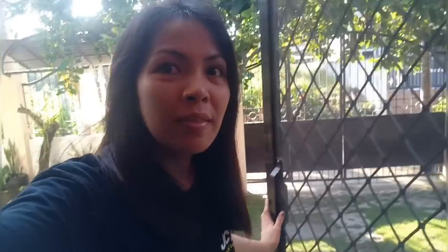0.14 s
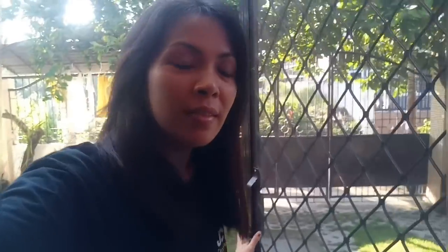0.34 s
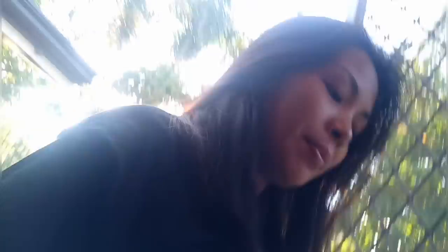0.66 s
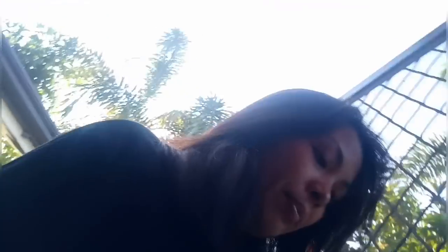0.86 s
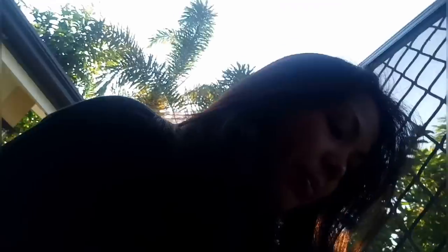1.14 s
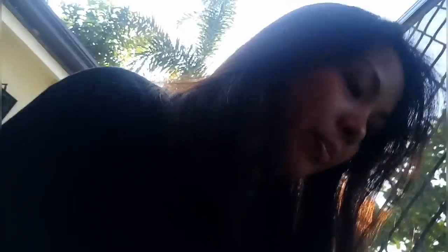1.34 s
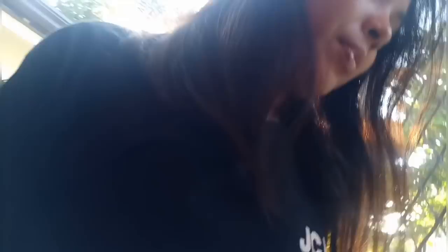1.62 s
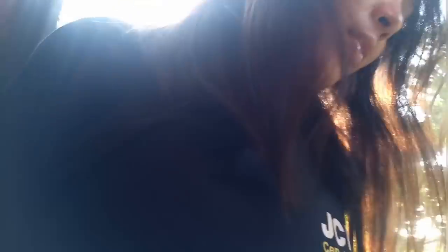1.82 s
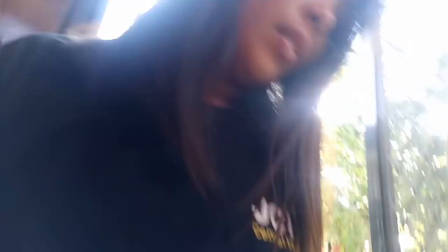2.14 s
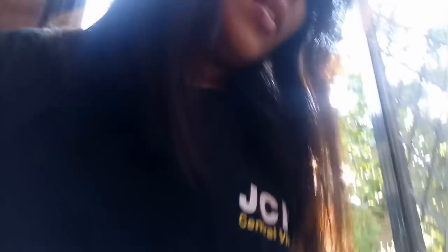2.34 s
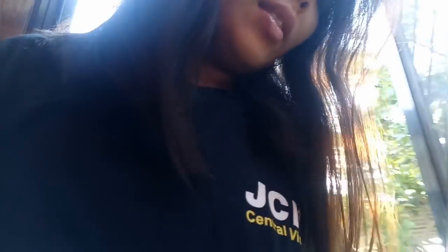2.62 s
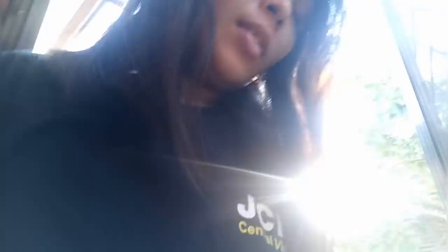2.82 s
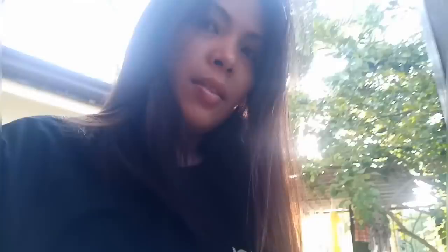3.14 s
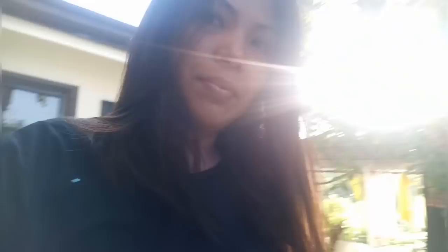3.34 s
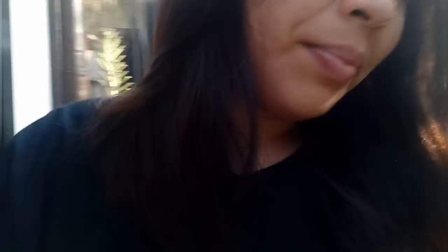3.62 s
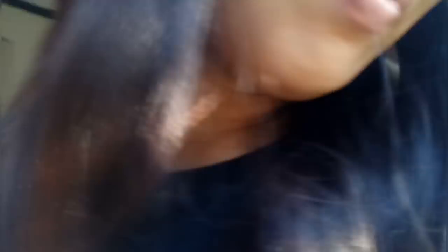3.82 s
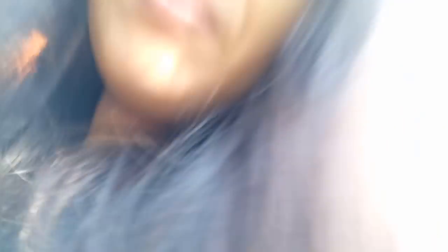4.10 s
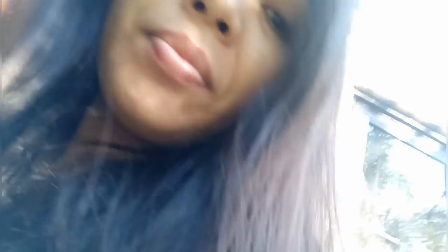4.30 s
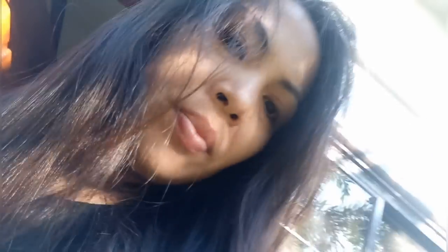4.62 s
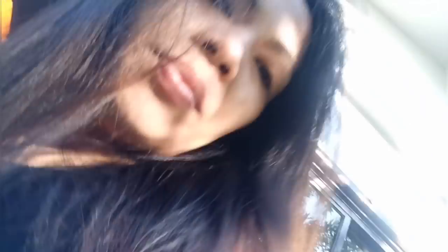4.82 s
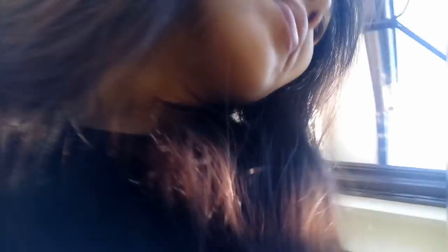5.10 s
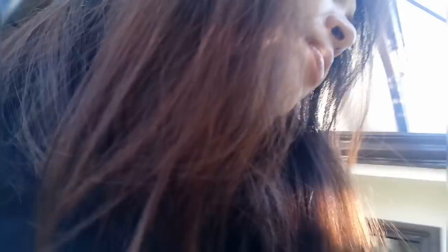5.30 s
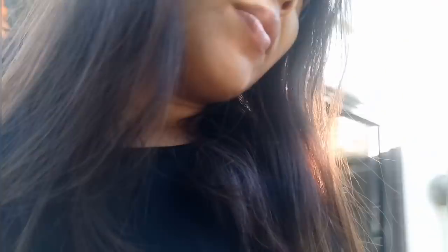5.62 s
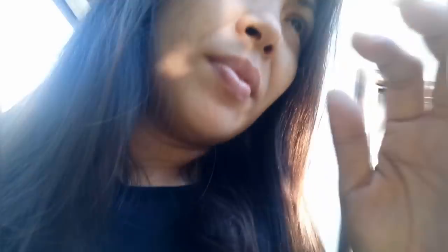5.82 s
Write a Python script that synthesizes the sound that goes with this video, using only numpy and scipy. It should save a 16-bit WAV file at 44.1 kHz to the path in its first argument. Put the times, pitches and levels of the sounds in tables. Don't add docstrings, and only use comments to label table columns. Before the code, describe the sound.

A close, rough phone pickup in an open yard, weighted to the left, with slight short echo and a faint far engine hum that swells now and then. From 0 to 0.6 s cloth and hair rustle and crackle, with a gritty grate and a thin, very high hinge squeak at about 0.3 s. Softer rustling and small taps follow. At 1.7 s a loud, nearly pure squeal swells, then breaks and drops in throbs by 2.05 s, among dry clicks and a latch rattle at 2.15 s. Fabric crackles and ticks around 2.6 s. At 3.1 s another squeal throbs away into falling scrapes; at 3.55 s come chirps and rasps, then a higher, longer squeal grips repeatedly until 4.05 s and ends falling by 4.3 s. Light latch rattles follow at 4.5 s, a heavy knock at 4.8 s, rustling and taps near 5.2 s, a sagging rough squeak at 5.4 s, and a low groan with a faint rising chirp at the end.

```python
import sys
import numpy as np
from scipy import signal
from scipy.fft import rfft, irfft, next_fast_len
from scipy.io import wavfile
from scipy.ndimage import uniform_filter1d, minimum_filter1d

SR = 44100
rng = np.random.default_rng(int(sys.argv[2]) if len(sys.argv) > 2 else 0)


def undo_db(level):
    steps = np.asarray(level, float) / 20
    return 10 ** steps


def put_to_file(sound):
    columns = np.atleast_2d(sound).T
    safe = np.clip(columns, -1, 1)
    whole_steps = np.round(safe * 32767)
    wavfile.write(sys.argv[1], SR, whole_steps.astype(np.int16))


N = 262629
TIME = np.arange(N) / SR
CONTROL_TIME = TIME[::64]

# (frequency [Hz], density [dB per Hz])
ENGINE_SPECTRUM = [(30, -26), (53, -7.5), (86, -6.5), (128, -0.5), (178, -8.5), (209, -18.5), (238, -14.5),
                   (260, -23), (340, -23.5), (570, -120)]
# (peak time [s], peak level [dB], fall [dB per s])
HUM_SWELLS = [
    (0.33, -65, 8),
    (1.21, -56.5, 124),
    (1.47, -62.5, 21),
    (2.19, -60, 152),
    (2.619, -59, 208),
    (2.83, -57.5, 27),
    (3.38, -59.5, 155),
    (3.882, -61.5, 45),
    (4.84, -55, 62),
    (5.9, -61, 27),
]
# (frequency [Hz], density [dB per Hz])
CLOTH_BED = [(250, -91), (500, -95), (1100, -99), (1800, -98), (3800, -85.5), (5500, -92.5)]
# (peak time [s], length [s], peak level [dB], centre [Hz])
STROKES = [(0.175, 0.36, -37, 2500), (0.282, 0.3, -32.5, 1820), (0.33, 0.33, -50, 604),
           (0.536, 0.35, -39.5, 2220), (0.972, 0.35, -49, 4400), (1.294, 0.1, -40.5, 3280),
           (1.6, 0.2, -46, 2150), (1.606, 0.67, -46.5, 4250), (1.928, 0.22, -38, 4900),
           (2.025, 0.2, -37, 3260), (2.162, 0.081, -36, 1430), (2.188, 0.079, -41.5, 630),
           (2.4, 0.069, -53, 1740), (2.567, 0.57, -47, 2160), (2.64, 0.099, -37.5, 3750),
           (2.798, 0.68, -45.5, 5000), (3.082, 0.06, -50, 3800), (3.325, 0.35, -46.5, 1740),
           (3.63, 0.21, -46, 3030), (4.148, 0.36, -44, 2900), (4.51, 0.14, -56, 2520),
           (2.647, 0.12, -51, 5500), (4.67, 0.22, -59.5, 3800), (4.836, 0.094, -42, 1700),
           (4.876, 0.58, -43, 3650), (4.902, 0.3, -49, 445), (5.176, 0.33, -35.5, 4770),
           (5.24, 0.2, -44, 940), (5.56, 0.84, -46, 3500), (5.742, 0.29, -47, 1390)]
# (peak time [s], length [s], peak level [dB], centre [Hz])
CRACKLES = [(0.205, .25, -44, 1820), (1.932, .08, -38, 5100), (2.524, 0.11, -39, 4300),
            (2.552, .06, -50, 2400), (2.638, .1, -42, 3030), (3.333, .12, -46.5, 3800),
            (3.61, .1, -47, 4100), (3.689, .1, -41, 3170), (4.856, .1, -47, 3220), (5.149, .1, -45, 1600),
            (5.17, .15, -42, 4300), (5.206, .08, -41, 2260), (5.259, .12, -47, 4300),
            (5.448, 0.096, -42, 3460), (2.17, .07, -40, 1350), (3.35, .1, -46, 1400), (3.6, .05, -40, 3400),
            (.1, .06, -46, 2500), (1.82, .08, -40, 4600)]
# (time [s], peak level [dB], ring [Hz], scratch level [dB], scratch t60 [s])
CLICKS = [
    (2.056, -25.5, 800, -38, .082),
    (2.615, -39, 1760, 10, 0.11),
    (4.318, -31, 1030, -34, 0.053),
    (4.845, -36, 496, 7, 0.052),
    (5.724, -30.5, 1050, -18, .08),
]
# (time [s], peak level [dB], ring [Hz], scratch level [dB], scratch t60 [s])
TAPS = [(1.57, -43, 1700, -10, 0.11), (5.283, -33.5, 2220, -2, 0.064), (5.436, -34.5, 3060, 4.5, 0.19),
        (1.925, -37, 1920, 2.5, 0.22), (2.156, -25.5, 1440, -7, 0.079), (2.293, -38, 1450, -1.5, 0.1),
        (2.583, -35, 3300, -4, 0.03), (4.579, -45, 5200, 9.5, 0.045), (4.449, -44.5, 2700, 2, 0.18),
        (4.8355, -29, 847, 0, 0.047), (4.979, -35, 4900, 4, 0.088), (5.192, -32, 2500, 0, 0.04),
        (5.18, -40, 3700, 3, .03)]
# (time [s], peak level [dB], ring [Hz], scratch level [dB], scratch t60 [s])
KNOCKS = [(0.176, -37.5, 1680, 9.5, 0.33), (0.213, -36, 2960, 6, 0.3), (1.259, -47.5, 3500, 10, 0.42),
          (1.262, -54, 950, 5.5, 0.36), (1.787, -24.5, 4970, 2.5, 0.09), (1.81, -34.5, 4600, 4, 0.14),
          (2.4225, -34.5, 4800, 1.5, 0.048), (2.616, -30.5, 4800, 4, 0.062), (2.545, -44, 1200, 4, 0.054),
          (3.406, -41.5, 2580, 4.5, 0.095), (3.406, -49, 4370, 2.5, 0.066), (5.284, -41, 445, 0, 0.22),
          (1.922, -35.5, 5400, 5.5, 0.13), (3.301, -47, 1420, 3, 0.45), (3.596, -47.5, 2500, 5.5, 0.59),
          (4.8064, -28, 1320, -8, 0.063), (4.8066, -39, 240, 5, 0.15), (4.8062, -18.5, 537, -41, 0.049),
          (5.193, -32, 520, -5, 0.36), (5.2, -36, 4100, 4.5, 0.4), (5.41, -32, 4630, 1.5, 0.051)]
# (time [s], length [s], first pitch [Hz], last pitch [Hz], peak level [dB])
GRATES = [
    (3.622, 0.053, 2850, 2760, -41),
    (0.28, 0.075, 2900, 2850, -40),
    (2.07, 0.097, 2550, 2250, -49),
    (5.44, 0.09, 3080, 3050, -43),
    (.205, .05, 3300, 3250, -41),
]
# (time [s], length [s], first pitch [Hz], last pitch [Hz], peak level [dB])
CHIRPS = [
    (0.335, 0.12, 4020, 4050, -47),
    (2.93, 0.24, 814, 743, -59),
    (3.535, 0.056, 2840, 2760, -37.5),
    (3.2, 0.061, 3900, 3950, -57),
    (4.787, 0.09, 3350, 3320, -43),
    (5.78, 0.33, 3394, 3460, -54),
    (5.8, .16, 6850, 6900, -60),
    (4.67, .12, 810, 790, -60),
]
# (time [s], length [s], first pitch [Hz], last pitch [Hz], peak level [dB])
SCRAPES = [
    (3.285, 0.052, 4780, 4370, -48.5),
    (3.31, 0.061, 3990, 3530, -44),
    (3.28, 0.12, 1870, 1190, -58),
    (3.585, 0.059, 4555, 3925, -43),
    (3.6, .06, 3900, 2950, -39),
    (3.615, .05, 4300, 3400, -44.5),
    (3.665, 0.074, 3484, 3090, -44.5),
]
# (time [s], slip rate [Hz], level [dB])
WAVERING_SQUEALS = [
    [(0.29, 4779, -58), (0.32, 4796, -32.5), (0.332, 4777, -33.5), (0.35, 4774, -45), (0.37, 4780, -44),
     (0.384, 4810, -51), (0.41, 4770, -47)],
    [(0.4, 4770, -48), (0.41, 4790, -49), (0.42, 4760, -38), (0.496, 4770, -44), (0.558, 4757, -57),
     (0.57, 4760, -72)],
]
# (time [s], slip rate [Hz], level [dB])
LONG_SQUEALS = [
    [(1.69, 3250, -64), (1.699, 3280, -27), (1.706, 3340, -25.5), (1.745, 3374, -23), (1.82, 3358, -18.5),
     (1.848, 3359, -19.5), (1.884, 3325, -25), (1.908, 3305, -22.5), (1.926, 3270, -32)],
    [(5.63, 907, -95), (5.656, 910, -46), (5.69, 940, -43), (5.715, 950, -52), (5.748, 962, -38),
     (5.842, 1018, -74), (5.884, 884, -53), (5.95, 840, -74)],
]
# (time [s], slip rate [Hz], level [dB])
BREAKING_SQUEAL = [(1.912, 3276, -32), (1.93, 3239, -29), (1.978, 3190, -32), (1.994, 3072, -30),
                   (2.002, 2895, -34), (2.012, 2670, -36), (2.032, 2660, -39.5), (2.06, 2690, -55)]
# (time [s], slip rate [Hz], level [dB])
THROBBING_SQUEALS = [
    [(3.072, 3151, -67), (3.08, 3200, -54), (3.11, 3229, -32), (3.13, 3227, -34.5), (3.158, 3249, -22.5),
     (3.198, 3265, -45)],
    [(3.188, 3275, -38), (3.194, 3285, -44), (3.204, 3208, -38), (3.216, 3271, -47), (3.228, 3224, -30.5),
     (3.248, 3140, -40), (3.266, 3144, -36.5), (3.312, 3180, -48), (3.325, 3180, -63)],
]
# (time [s], slip rate [Hz], level [dB])
REGRIPPING_SQUEALS = [
    [(3.645, 4677, -61), (3.663, 4756, -40.5), (3.689, 4740, -39), (3.717, 4754, -48), (3.751, 4744, -42.5),
     (3.765, 4779, -54), (3.772, 4769, -46)],
    [(3.762, 4777, -50), (3.788, 4738, -34), (3.818, 4702, -40), (3.868, 4727, -34.5), (3.884, 4730, -40.5),
     (3.924, 4746, -30), (3.946, 4776, -44), (3.95, 4764, -38)],
    [(3.94, 4792, -44), (3.964, 4724, -28), (4.016, 4714, -25.5), (4.042, 4650, -41)],
    [(4.032, 4678, -40), (4.056, 4705, -33.5), (4.062, 4720, -44), (4.076, 4665, -34.5),
     (4.096, 4677, -36.5), (4.106, 4709, -57), (4.12, 4685, -45), (4.2, 4685, -62)],
]
# (time [s], slip rate [Hz], level [dB])
FALLING_SQUEAL = [(4.09, 3270, -62), (4.1, 3240, -40), (4.114, 3150, -35), (4.138, 2990, -38),
                  (4.156, 2870, -34), (4.168, 2830, -46), (4.182, 2850, -33), (4.2, 2810, -42),
                  (4.31, 2800, -68)]
# (time [s], slip rate [Hz], level [dB])
SAGGING_SQUEAL = [(5.355, 3010, -60), (5.366, 3000, -37), (5.385, 2960, -42), (5.398, 2950, -50),
                  (5.408, 2940, -39), (5.438, 2850, -37), (5.47, 2740, -42), (5.52, 2620, -48),
                  (5.56, 2600, -60)]
# (octave level [dB], left minus right at the start [dB], left minus right at the end [dB])
SQUEAL_VOICES = [(-57.5, 21, 13), (-77, 13, 6), (-93, 8, 5), (-93, 8, 2), (-41.5, 10.5, 9.5),
                 (-44.5, 12.5, 6.5), (-95, 6, -1), (-100, 1.5, -1), (-91, 10, 6), (-94, 5, 5)]
# (peak time [s], length [s], peak level [dB], centre [Hz])
RUBS = [(0.37, 0.21, -58.5, 298), (2.28, 0.18, -57, 230), (4.55, 0.66, -66, 490), (4.345, 0.1, -66, 680),
        (4.83, 0.37, -57, 262), (3, 0.15, -76, 345), (5.38, 0.13, -55, 271), (3.3, 0.4, -59, 764),
        (5.9, 0.33, -59.5, 790), (0.644, 0.19, -49.5, 6010), (4.655, 0.095, -51, 4140),
        (5.58, 0.21, -43.5, 4040), (1.5, 0.091, -51.5, 3850), (3.1, 0.11, -69.5, 314),
        (1.032, 0.34, -68.5, 1620), (5.6, 0.38, -58, 5100), (2.9, 0.63, -61.5, 4700),
        (4.47, 0.085, -52, 5600), (4.59, 0.047, -54, 5550), (4.7, 0.12, -51, 1580),
        (0.45, 0.22, -59.5, 510), (3.6, 0.036, -42.5, 4100)]
# (time [s], peak level [dB])
RATTLES = [
    (2.156, -34),
    (2.294, -59),
    (4.449, -35),
    (4.489, -42),
    (4.58, -40.5),
]
# (frequency [Hz], level [dB], t60 [s])
LATCH_MODES = [(1020, -5, .05), (1360, 0, .06), (1770, 0, .07), (2330, -6, .05)]

CLOTH_PAN_DB = 9.5


def rms1(x):
    return x / np.sqrt(np.mean(x ** 2, axis=-1, keepdims=True))


def band(x, lo_hz, hi_hz, order=2):
    return signal.sosfilt(signal.butter(order, [lo_hz, hi_hz], "band", fs=SR, output="sos"), x)


def low_pass(order, hz):
    return signal.butter(order, hz, fs=SR, output="sos")


def decay(t, t60):
    return np.exp(-np.log(1000) * t / t60)


def density_db(hz, spectrum, *ends):
    corner_hz, db = np.transpose(spectrum)
    return np.interp(np.log(hz), np.log(corner_hz), db, *ends)


def walk(rate):
    hold = int(SR / rate)
    steps = np.repeat(rng.standard_normal(N // hold + 1), hold)[:N]
    return 1.3 * uniform_filter1d(uniform_filter1d(steps, hold), hold)


def ports(db, pan_db):
    return 2 * undo_db(db) / np.sqrt(1 + undo_db(2 * np.array([-pan_db, pan_db])))


def swells(base_db=-76, rise_db_per_s=83):
    s, peak_db, fall = np.transpose(HUM_SWELLS)[:, :, None]
    db = peak_db - np.maximum((s - CONTROL_TIME) * rise_db_per_s, (CONTROL_TIME - s) * fall)
    power = undo_db(2 * base_db) + np.sum(undo_db(2 * db), axis=0)
    return np.interp(TIME, CONTROL_TIME, 10 * np.log10(power))


def engine(pan_db=12.5, likeness=.7):
    hz = np.fft.rfftfreq(N, 1 / SR) + 1
    gain = undo_db(density_db(hz, ENGINE_SPECTRUM, -60, -90))
    left, other = rms1(irfft(rfft(rng.standard_normal((2, N))) * gain, N))
    right = likeness * left + np.sqrt(1 - likeness ** 2) * other
    return np.array([left, right]) * ports(swells(), pan_db + 0 * TIME)


def stroke(s, length, db, at, rise_share=.39, edge_db=-17):
    return db + edge_db * np.maximum((s - at) / rise_share, (at - s) / (1 - rise_share)) / length


def rustle(grain_db=3.2, grains_per_s=1000, hiss=.8, edge_hz=6300, spread_octaves=.58, pan_swing_db=3.5):
    s, length, db, centre = np.transpose(STROKES)[:, :, None]
    power = undo_db(2 * stroke(s, length, db, CONTROL_TIME))
    caught = rng.random((2, N)) < grains_per_s / SR
    snap_size = undo_db(grain_db * np.minimum(rng.exponential(size=(2, N)), 3.5))
    snaps = caught * snap_size * rng.standard_normal((2, N))
    source = rms1(snaps) + hiss * rng.standard_normal((2, N))
    out = 0
    for hz in 210 * 2 ** np.arange(0, 5.1, .25):
        share = 0.3 * np.exp(-np.abs(np.log2(hz / centre) / spread_octaves) ** 1.19)
        bed = undo_db(2 * density_db(hz, CLOTH_BED)) * 0.13 * hz
        size = np.interp(TIME, CONTROL_TIME, np.sqrt(bed + np.sum(share * power, axis=0)))
        size = size * undo_db(1.6 * walk(30))
        out = out + size * rms1(band(source, hz * 2 ** -.125, hz * 2 ** .125))
    pan_db = CLOTH_PAN_DB + pan_swing_db * walk(4.02)
    return signal.sosfilt(low_pass(10, edge_hz), out) * ports(0, pan_db)


def crackle(count=40, spread_octaves=.37, scatter_db=3.5, cycles=9):
    out, t = np.zeros((2, N + SR)), np.arange(512) / SR
    for s, length, db, centre_hz in CRACKLES:
        when, pitch, size, turn = rng.standard_normal((count, 4)).T[:, :, None]
        at = s + length * np.clip(when, -2, 2) / 2
        start = (np.abs(at) * SR).astype(int)
        hz = np.minimum(centre_hz * 2 ** (spread_octaves * pitch), 7000)
        swell = undo_db(scatter_db * np.minimum(size, 1.6)) * (1 - np.exp(-t * hz))
        tone = np.sin(2 * np.pi * hz * t + np.array([0 * turn, turn]))
        snap = swell * decay(t, cycles / hz) * tone
        for port, gain in enumerate(ports(db, CLOTH_PAN_DB)):
            np.add.at(out[port], start + np.arange(len(t)), gain * snap[port])
    return out[:, :N]


def ticks(far_s=.0006, cycles=10, pan_db=13, pan_db_per_octave=3.5, broad=.3):
    out, t = np.zeros((2, N + 26000)), np.arange(16000) / SR
    u = t / .00006 - 3
    crack = -1.65 * u * np.exp(-u ** 2 / 2)
    kinds = (CLICKS, 10), (TAPS, 4.5), (KNOCKS, -41)
    hits = [(*row, crack_db) for rows, crack_db in kinds for row in rows]
    for s, db, hz, scratch_db, scratch_t60, crack_db in hits:
        grit = rng.standard_normal((2, len(t))) * undo_db(2.5 * rng.exponential(size=(2, len(t))))
        grit = rms1(band(grit, hz / 1.3, hz * 1.3)) + broad * rms1(band(grit, 900, 6300, order=4))
        ring = np.sin(2 * np.pi * hz * t) * decay(t, cycles / hz)
        scratch = undo_db(scratch_db) * grit / 3 * decay(t, scratch_t60)
        sides = ports(db, pan_db - pan_db_per_octave * np.log2(hz / 1000))
        touch = sides[:, None] * (ring + undo_db(crack_db) * crack + scratch)
        for port, hit in enumerate(touch):
            i = int((s + port * far_s) * SR)
            out[port, i:i + len(t)] += hit
    return out[:, :N]


def catches(rows, grip_s=.0107, start_db=-43, slacken_db=-7.5):
    return [[(s, first_hz, db + start_db), (s + grip_s, first_hz, db), (s + length, last_hz, db + slacken_db)]
            for s, length, first_hz, last_hz, db in rows]


def hinge_sounds():
    squeals = LONG_SQUEALS + WAVERING_SQUEALS + THROBBING_SQUEALS + REGRIPPING_SQUEALS
    sounds = [(table, *voice, .012, 55) for table, voice in zip(squeals, SQUEAL_VOICES)]
    rough = (BREAKING_SQUEAL, -47, 9), (FALLING_SQUEAL, -67, 10.5), (SAGGING_SQUEAL, -61, 8)
    sounds += [(table, octave_db, pan_db, pan_db, .3, 70) for table, octave_db, pan_db in rough]
    for rows, rasp, width_hz in (CHIRPS, .1, 70), (GRATES, .3, 110), (SCRAPES, .65, 200):
        sounds += [(table, table[1][2] - 28.5, 8.5, 8.5, rasp, width_hz) for table in catches(rows)]
    return sounds


def hinge(fade_s=.009):
    out = np.zeros((2, N))
    lag = np.array([0 * TIME, np.pi / 2 + .25 * walk(14)])
    flutter = undo_db(np.array([.6 * walk(60), 2.5 * walk(40)]))
    waver_hz = 5 * walk(90)
    chance = rng.standard_normal((2, N)) + 1j * rng.standard_normal((2, N))
    overtone = undo_db(3 * walk(45))
    for table, octave_db, pan_db, last_pan_db, rasp, width_hz in hinge_sounds():
        s, *columns = np.transpose(table)
        on = slice(int(s[0] * SR), int(s[-1] * SR))
        hz, db = (np.interp(TIME[on], s, c) for c in columns)
        phase = 2 * np.pi * np.cumsum(hz + waver_hz[on]) / SR + lag[:, on]
        contact = np.clip(np.minimum(TIME[on] - s[0], s[-1] - TIME[on]) / fade_s, 0, 1)
        slips = signal.sosfilt(low_pass(2, width_hz), chance[:, on])
        grip = np.sqrt(1 - rasp) + np.sqrt(rasp) * slips / slips.std()
        octave = undo_db(np.minimum(octave_db - db, 3)) * overtone[on] * np.exp(2j * phase)
        tone = np.exp(1j * phase) + octave
        sides = ports(db, np.linspace(pan_db, last_pan_db, len(db)))
        out[:, on] += np.sqrt(2) * contact * flutter[:, on] * sides * (grip * tone).imag
    return out


def rubs(half_octaves=.2, grain_db=3):
    out = np.zeros((2, N))
    for s, length, db, hz in RUBS:
        on = slice(max(int((s - .3) * SR), 0), int((s + .5) * SR))
        at = TIME[on]
        grit = rng.standard_normal((2, SR)) * undo_db(grain_db * rng.exponential(size=(2, SR)))
        width = half_octaves * min(1, 2200 / hz)
        grit = rms1(band(grit, hz * 2 ** -width, hz * 2 ** width))
        out[:, on] += grit[:, :len(at)] * ports(stroke(s, length, db, at), CLOTH_PAN_DB + 0 * at)
    return out


def latch(chatter_s=.024, pan_db=19):
    out, t = np.zeros((2, N)), np.arange(SR // 4) / SR
    for s, db in RATTLES:
        chatter = rng.standard_normal((2, len(t))) * np.exp(-t / chatter_s)
        body = sum(undo_db(mode_db + rng.standard_normal()) * np.sin(2 * np.pi * hz * t) * decay(t, t60)
                   for hz, mode_db, t60 in LATCH_MODES)
        rung = signal.fftconvolve(chatter, body[None], axes=1)[:, :len(t)]
        rung = rung / np.abs(rung).max(axis=1, keepdims=True)
        i = int(s * SR)
        out[:, i:i + len(t)] += ports(db, pan_db)[:, None] * rung
    return out


def yard(x, heard, t60, db):
    t = np.arange(SR // 2) / SR
    echo = rng.standard_normal((2, len(t))) * decay(t, t60) * (t > .004)
    echo /= np.sqrt(np.sum(echo ** 2, axis=1, keepdims=True))
    return x + undo_db(db) * signal.fftconvolve(heard, echo, axes=1)[:, :N]


def scene():
    cloth = rustle() + crackle() + undo_db(3) * rubs()
    gate = ticks() + hinge() + latch()
    gate_in_yard = yard(band(gate, 70, 20000), gate[:1], t60=.4, db=-21)
    cloth_nearby = yard(cloth, cloth, t60=.15, db=-3) * .8
    return gate_in_yard + cloth_nearby + engine()


def nearest_sample(dry, sensed_per_s=SR + 3889):
    size = next_fast_len(N + 2048)
    padded = np.pad(dry, ((0, 0), (0, size - N)))
    sensed = signal.resample(padded, round(size * sensed_per_s / SR), axis=1)
    nearest = np.round(np.arange(N) * sensed.shape[1] / size).astype(int)
    return sensed[:, nearest]


def thin_hiss(x, under_db=-20, left_db=-24):
    hz, _, bins = signal.stft(x, SR, nperseg=1024)
    size = np.abs(bins)
    strongest = -minimum_filter1d(-size, size=33, axis=1, origin=9)
    faint = (size < undo_db(under_db) * strongest) & (hz[:, None] > 3000)
    faint &= size < 2.8 * uniform_filter1d(size, size=17, axis=1)
    return signal.istft(bins * np.where(faint, undo_db(left_db), 1), SR, nperseg=1024)[1][:, :N]


def roll_off(x):
    return signal.sosfilt(signal.butter(12, 14310, fs=SR, output="sos"), x)


def record(dry):
    cut = signal.sosfiltfilt(low_pass(24, 13150), nearest_sample(dry))
    return roll_off(thin_hiss(cut))


dry = scene()
out = record(dry)
put_to_file(out)
```